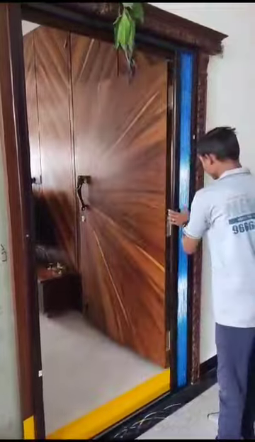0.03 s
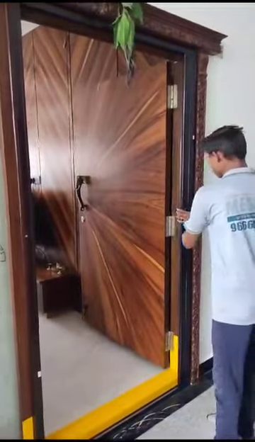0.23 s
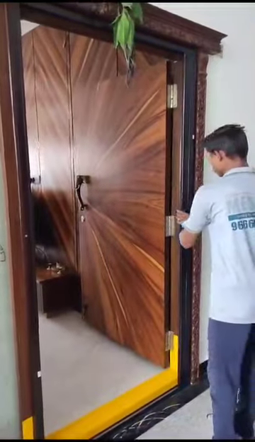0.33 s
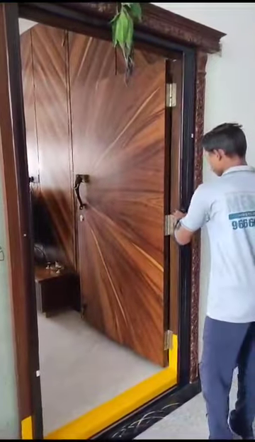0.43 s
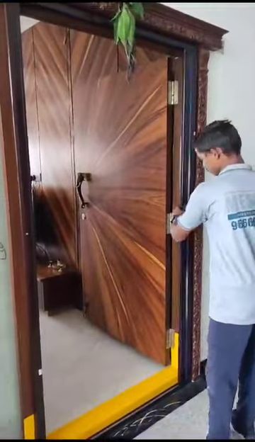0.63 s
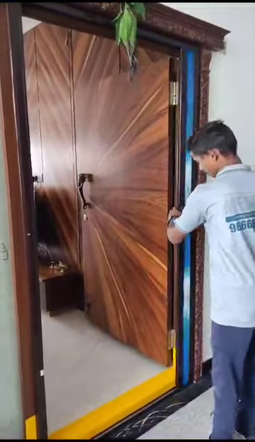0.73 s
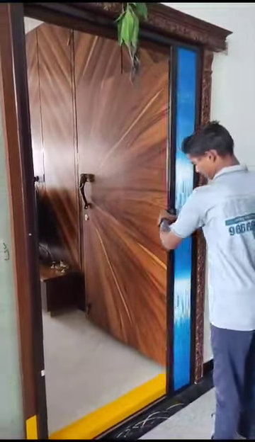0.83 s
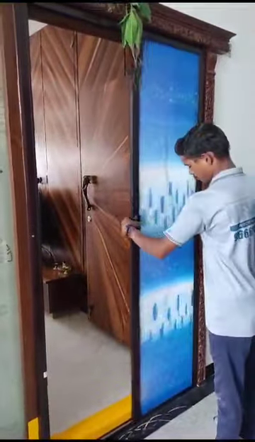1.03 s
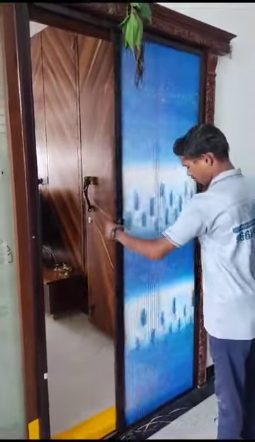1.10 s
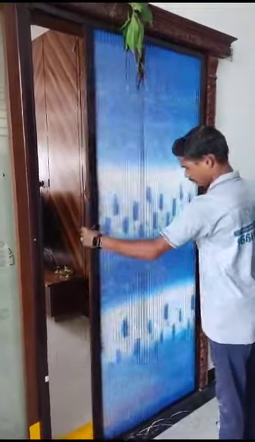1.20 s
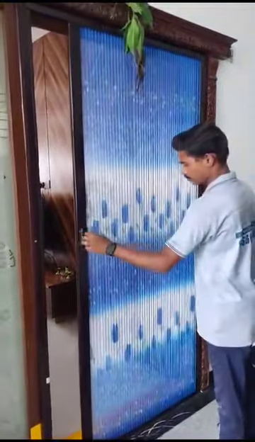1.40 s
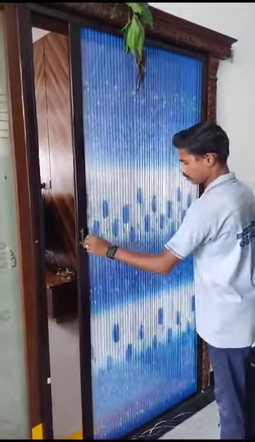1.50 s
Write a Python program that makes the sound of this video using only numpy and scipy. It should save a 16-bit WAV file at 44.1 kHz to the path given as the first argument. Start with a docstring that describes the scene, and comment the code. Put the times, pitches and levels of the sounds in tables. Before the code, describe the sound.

In a bare, quiet hallway, a pleated screen door scrapes along its track and its handle bar knocks the hollow frame. It then slides back out, rumbling softly while its cords whirr up in pitch and fall away.

```python
"""In a bare, quiet hallway a pleated screen door slides, folds up with a clack, and is drawn out again. Stick-
slip friction of pleats and brush strip gives a grainy hiss and a dull scuff; the guides rumble in the rail, the
runner hums, and the cords whirr at a pitch that rises with speed. The handle bar strikes the hollow frame,
whose modes ring on over a low boom from the swaying door leaf. The hallway adds reverberation, faint room noise
and a low hum."""
import sys
import numpy as np
from scipy import signal
from scipy.fft import rfft, irfft, next_fast_len
from scipy.io import wavfile

SR = 44100
rng = np.random.default_rng(int(sys.argv[2]) if len(sys.argv) > 2 else 0)


def bounce(signal):
    """Save signal as a 16-bit WAV file at the path given by the first command-line argument."""
    frames = np.transpose(np.atleast_2d(signal))
    limited = np.clip(frames, -1, 1)
    pcm = np.round(limited * 32767).astype(np.int16)
    wavfile.write(sys.argv[1], SR, pcm)


N = 68355
TIME = np.arange(N) / SR
MODE_BUILD_S = .012

# The handle bar touches the frame, lands and rebounds: (time [s], crack level [dB], thud level [dB])
KNOCKS = [(0.231, -11, -34), (0.2385, 0, -13), (0.2424, 1.5, 0.5), (0.2545, -18, -1), (0.269, -30, -4)]
# Likeness of the sound at the two microphones: (frequency [Hz], correlation [-1 to 1])
COHERENCE = [(100, .9), (300, 0.95), (600, 0.1), (1200, -0.12), (3000, 0), (10000, 0)]


def from_db(db):
    """Amplitude grows tenfold every 20 dB."""
    return 10 ** (np.asarray(db) / 20)


def rms_one(x):
    """Normalisation to unit power."""
    return x / np.sqrt(np.mean(x ** 2) + 1e-20)


def in_time(rows):
    """Linear interpolation between (time, value) points."""
    return np.interp(TIME, *np.transpose(rows))


def at_hz(points, hz):
    """Interpolation on a logarithmic frequency axis."""
    f, value = np.transpose(points)
    return np.interp(np.log(hz), np.log(f), value)


def colour(x, spectrum):
    """Minimum-phase filtering to a spectral shape; white noise keeps its power."""
    size = 2 * next_fast_len(N)
    hz = np.maximum(np.fft.rfftfreq(size, 1 / SR), 1)
    gain = rms_one(from_db(at_hz(spectrum, hz)))
    cepstrum = irfft(np.log(gain))
    cepstrum[1:size // 2] *= 2  # folding the cepstrum makes the filter causal
    cepstrum[size // 2 + 1:] = 0
    return irfft(rfft(x, size) * np.exp(rfft(cepstrum)))[..., :N]


def drift(rate_hz):
    """Low-passed noise: a random fluctuation of unit power."""
    pole = np.exp(-2 * np.pi * rate_hz / SR)
    return rms_one(signal.lfilter([1], [1, -2 * pole, pole * pole], rng.standard_normal(2 * N))[N:])


def rough_tone(phase, width_hz):
    """Random modulation of amplitude and phase widens a tone into a narrow band."""
    return rms_one(drift(width_hz) * np.cos(phase) + drift(width_hz) * np.sin(phase))


def at_microphones(x):
    """Path difference: direct sound reaches the left microphone 0.13 ms later."""
    return np.array([np.interp(TIME - .00013, TIME, x), x])


def diffuse_bands():
    """A diffuse field is partly coherent at two points; yields (centre [Hz], stereo noise band)."""
    edges_hz = np.r_[np.geomspace(22, 200, 7)[:-1], np.geomspace(200, 5000, 22)[:-1],
                     np.geomspace(5000, 16500, 13)]
    white = rng.standard_normal((2, 2, N))
    for k, (low, high) in enumerate(zip(edges_hz, edges_hz[1:])):
        bandpass = signal.butter(2, [low, high], "band", fs=SR, output="sos")
        mid, side = signal.sosfilt(bandpass, white[k % 2])
        hz = np.sqrt(low * high)
        alike = np.clip(at_hz(COHERENCE, hz), -1, 1)
        yield hz, np.sqrt(1 + alike) * mid + np.sqrt(1 - alike) * side * [[1], [-1]]


def stored_power(power, retained):
    """Leaky integration: a fixed share of the energy is retained from sample to sample."""
    return signal.lfilter([1 - retained], [1, -retained], power, zi=[retained * power[0]])[0]


def reverberation(power):
    """The hallway stores the power fed in as diffuse sound, which decays fastest in the top treble."""
    # Reverberation time of the hallway: (frequency [Hz], T60 [s])
    hall_t60 = [(120, 0.42), (280, 0.87), (1000, 0.89), (2500, 0.7), (5000, 0.59), (8000, 0.64),
                (14000, 0.26)]
    field, steady = 0, 0
    for hz, band in diffuse_bands():
        retained = from_db(-120 / (at_hz(hall_t60, hz) * SR))  # power falls 60 dB in one T60
        field = field + band * np.sqrt(stored_power(power, retained))
        steady = steady + band
    return field / steady.std()


def slips(per_second=5600, spread_db=2.5):
    """Stick-slip friction releases tiny clicks of uneven size at random moments."""
    sizes = from_db(spread_db * np.minimum(rng.exponential(1, N), 3)) * rng.choice([-1, 1], N)
    return rms_one(sizes * (rng.random(N) < per_second / SR))


def contact_noise(envelope, spectrum, direct_db=-6, hall_build_s=.00033):
    """Slips along the door arrive as direct plus reverberant sound, sharing one spectrum."""
    direct = from_db(direct_db)
    power = stored_power(envelope ** 2 + 1e-18, np.exp(-1 / (hall_build_s * SR)))
    heard = direct * at_microphones(slips() * envelope) + reverberation(power)
    return colour(heard, spectrum) / np.hypot(1, direct)


def sliding_friction():
    """One friction effort drives the pleats' hiss, the brush strip's scuff and the rail's rumble."""
    # Strength of the rubbing: (time [s], level [dB])
    rubbing = [(0, -46), (.11, -49), (.22, -48), (.26, -60), (.69, -69), (.708, -51.5), (.79, -54),
               (.875, -47.5), (.97, -47.5), (1.04, -45), (1.10, -45), (1.16, -42), (1.185, -39),
               (1.265, -44.5), (1.305, -41.5), (1.33, -62.5), (1.38, -46.5), (1.45, -78), (1.55, -89)]
    # Spectrum of the rubbing pleats: (frequency [Hz], relative level [dB])
    pleat_spectrum = [(500, -15.5), (800, -10), (1350, -5), (1650, -5), (2100, 0), (2450, -1), (2800, -3.5),
                      (3200, -9.5), (4300, -13), (6200, -5.5), (7250, 1.5), (8600, 0), (9200, -5.5),
                      (9700, -15.5), (15000, -28.5)]
    # Spectrum of the bar's brush strip, prominent at low speed: (frequency [Hz], relative level [dB])
    brush_spectrum = [(500, -23.5), (1200, 12), (2400, 9.5), (3200, 0), (4000, 6.5), (5500, 6), (7200, -4),
                      (8700, -5), (9700, -21), (15000, -29)]
    # Spectrum of the guides in the rail: (frequency [Hz], relative level [dB])
    rail_spectrum = [(100, -40), (150, -5.5), (185, -11), (240, -0.5), (305, -5.5), (420, -3), (520, -7),
                     (700, -5.5), (1200, -1.5), (3000, -36)]
    usual_db, judder_db, standstill_db = -46, 1.75, -13.5
    effort_db = in_time(rubbing) - usual_db - judder_db * drift(rate_hz=90)
    moving = np.clip((effort_db - standstill_db) / 10, 0, 1)
    # Each level is its value at the usual effort plus a slope times the effort.
    hiss = contact_noise(from_db(-43 + 1.395 * effort_db), pleat_spectrum)
    scuff = contact_noise(moving * from_db(-51 + .18 * effort_db), brush_spectrum)
    rumble = contact_noise(from_db(-59.5 + .41 * effort_db), rail_spectrum)
    return hiss + scuff + rumble


def cord_whirr():
    """Cords zipping through the pleats excite a wavering, raspy tone whose pitch rises with speed."""
    # Whirr of the cords: (time [s], frequency [Hz], level [dB])
    glide = [(0, 1860, -49), (.03, 1740, -49), (.09, 1680, -54), (.125, 1460, -55), (.155, 1435, -51),
             (.22, 1420, -59), (.28, 900, -66), (.75, 850, -73), (.86, 1380, -58), (.94, 1900, -58),
             (.99, 2210, -55), (1.018, 2310, -47.5), (1.06, 2500, -46.5), (1.11, 2720, -46),
             (1.17, 2820, -45), (1.23, 2780, -45.5), (1.31, 2400, -54), (1.38, 1900, -62), (1.5, 1313, -80)]
    # A slacker, lower cord that joins in at full speed: (time [s], level [dB])
    slack_cord = [(1.13, -70), (1.18, -53), (1.3, -56), (1.36, -72)]
    waver_hz, slack_pitch_ratio, direct = 45, .76, from_db(3)
    times, hz, db = np.transpose(glide)
    pitch_hz = np.interp(TIME, times, hz) + waver_hz * drift(rate_hz=120)
    phase = 2 * np.pi * np.cumsum(pitch_hz) / SR
    rasp = rough_tone(phase, width_hz=130)
    tone = (np.sqrt(2) * np.sin(phase) + rasp) * from_db(np.interp(TIME, times, db))
    tone += from_db(in_time(slack_cord)) * rough_tone(slack_pitch_ratio * phase, width_hz=200)
    impulse_response = reverberation(1.0 * (np.arange(N) == 1))
    lingering = signal.fftconvolve(tone[None], impulse_response, axes=1)[:, :N]
    return (direct * at_microphones(tone) + lingering) / np.hypot(1, direct)


def runner_hum(pitches_hz=(371.6, 303.8), width_hz=20.5):
    """Friction-driven vibration: the runner judders along the track, humming roughly at two pitches."""
    # Hum of the runner: (time [s], upper tone level [dB], lower tone level [dB])
    hum_levels = [(0, -46, -66), (0.119, -59, -70), (.24, -68, -70), (.7, -76, -66), (.9, -59.5, -57.5),
                  (1.02, -64, -69), (1.07, -51.5, -61), (1.2, -56, -57.5), (1.3, -61.5, -62),
                  (1.44, -61, -56.5), (1.55, -98, -69)]
    times, *levels = np.transpose(hum_levels)
    hum = sum(from_db(np.interp(TIME, times, db)) * rough_tone(2 * np.pi * hz * TIME, width_hz)
              for hz, db in zip(pitches_hz, levels))
    return at_microphones(hum)


def room_noise(noise_db=-51, hum_hz=72.9, hum_db=-64.5):
    """A steady diffuse field with a low hum forms the noise floor."""
    # Spectrum of the quiet hallway: (frequency [Hz], relative level [dB])
    floor_spectrum = [(25, -2), (55, -6.5), (70, -5), (87, 5), (110, -15), (150, 1), (220, -3.5),
                      (310, -0.5), (600, -3), (1200, -10), (2600, -12.5), (4000, -21.5), (8000, -20),
                      (10000, -66)]
    diffuse = sum(band for _, band in diffuse_bands())
    air = rms_one(colour(diffuse, floor_spectrum))
    hum = np.sqrt(2) * np.sin(2 * np.pi * hum_hz * TIME)
    return from_db(noise_db) * air + from_db(hum_db) * hum


def impact_decay(start, t60, rise_s=.002):
    """Damping makes the envelope of an impact fall exponentially after a quick rise."""
    age = np.maximum(TIME - start, 0)
    return np.minimum(age / rise_s, 1) * from_db(-60 * age / t60)


def bar_clack():
    """Successive impacts add in power: the bar cracks, the frame thuds and the pleats rattle on."""
    # Spectrum of the bar's crack and the pleats' rattle: (frequency [Hz], relative level [dB])
    crack_spectrum = [(200, -23.5), (400, -0.5), (600, -10), (720, -3), (850, -2), (1020, 5), (1230, -4.5),
                      (1420, -2.5), (2100, 0.5), (2750, -1), (3100, -11), (3300, -7), (4300, -12),
                      (5200, -6), (6300, -9.5), (7200, -4), (8600, -7), (9700, -22), (15000, -35)]
    # Spectrum of the frame's thud: (frequency [Hz], relative level [dB])
    thud_spectrum = [(100, -48), (150, -13), (200, -9.5), (230, -7.5), (265, 4.5), (310, -1), (360, 0.5),
                     (420, -1), (500, -1.5), (570, -13.5), (720, -9), (1300, -32.5)]
    crack_power, thud_power = 0, 0
    for start, crack_db, thud_db in KNOCKS:
        rattle = from_db(-29) * impact_decay(start, t60=.5)
        crack_power += (from_db(crack_db) * np.hypot(impact_decay(start, t60=.026), rattle)) ** 2
        thud_power += (from_db(thud_db) * impact_decay(start, t60=.025)) ** 2
    crack = contact_noise(from_db(-9.5) * np.sqrt(crack_power), crack_spectrum, direct_db=-6.5)
    thud = contact_noise(from_db(-19.5) * np.sqrt(thud_power), thud_spectrum, direct_db=-6.5)
    return crack + thud


def frame_ring(level_db=-34.5):
    """The hardest knock excites the frame's normal modes; higher ones reach the pair out of phase."""
    # Modes of the hollow frame: (frequency [Hz], relative level [dB], T60 [s])
    modes = [(269, 2, 0.53), (288.3, -4.5, 1), (309.4, -6, 1), (395.6, -1, .42), (443.6, 5, 0.26),
             (477, 3, 0.28), (498, -4.5, 0.66), (817, 3.5, 0.28), (908, -15, 0.29), (971, -1, 0.3),
             (988, -12, .4), (1370, -4, 0.98), (1402, -10, 1), (2003, -17, 0.47), (2250, -26, 0.42),
             (2262, -24, .57), (3233, 3, 0.24)]
    hardest = max(KNOCKS, key=lambda knock: knock[1])
    age = np.maximum(TIME - hardest[0], 0)
    ring = 0
    for hz, db, t60 in modes:
        phase_gap = np.arccos(np.clip(at_hz(COHERENCE, hz), -1, 1)) * rng.choice([-1, 1])
        phase = 2 * np.pi * rng.random() + np.array([[0], [phase_gap]])
        ring = ring + from_db(level_db + db - 60 * age / t60) * np.sin(2 * np.pi * hz * age + phase)
    return ring * (1 - np.exp(-age / MODE_BUILD_S))


def leaf_boom(delay_s=.0032):
    """Structural coupling: the door leaf takes up the last rebound and sways, booming softly in its low modes."""
    # Low modes of the swaying door leaf: (frequency [Hz], level [dB], T60 [s])
    modes = [(138.3, -40.5, .25), (183.6, -42.5, 0.54)]
    age = np.maximum(TIME - KNOCKS[-1][0] - delay_s, 0)
    boom = sum(from_db(db - 60 * age / t60) * np.sin(2 * np.pi * hz * age) for hz, db, t60 in modes)
    return at_microphones(boom * (1 - np.exp(-age / MODE_BUILD_S)))


def scene():
    """Superposition: the door's sliding and impact sounds add to the hallway's noise."""
    sliding = sliding_friction() + cord_whirr() + runner_hum()
    return sliding + bar_clack() + frame_ring() + leaf_boom() + room_noise()


def record(dry):
    """Each microphone has its own frequency response; a steep low-pass limits the bandwidth."""
    # Imbalance of the microphone pair: (frequency [Hz], left minus right level [dB])
    balance = [(100, 7), (500, 5.5), (700, 3.5), (1400, 4.5), (2300, 3.5), (3300, -0.5), (6000, -1),
               (7300, -6), (8400, 3.5), (9600, 3.5), (11000, 0.5)]
    cutoff_hz = 15200
    left = colour(dry[0], [(hz, db / 2) for hz, db in balance])
    right = colour(dry[1], [(hz, -db / 2) for hz, db in balance])
    lowpass = signal.ellip(10, .1, 80, cutoff_hz, fs=SR, output="sos")
    return signal.sosfilt(lowpass, [left, right])


dry = scene()
out = record(dry)
bounce(out)
```